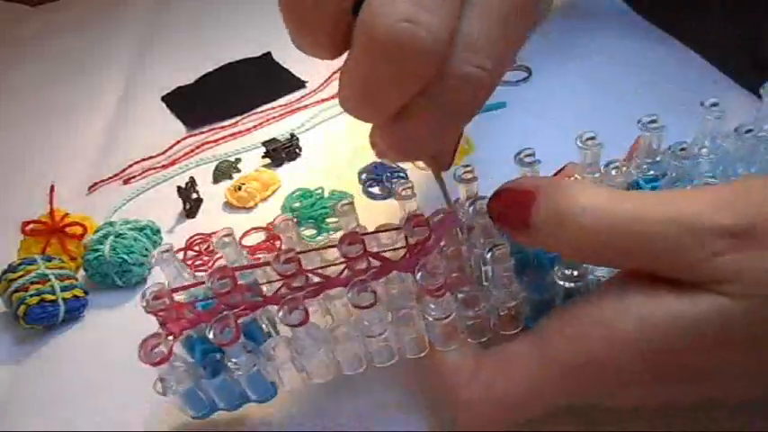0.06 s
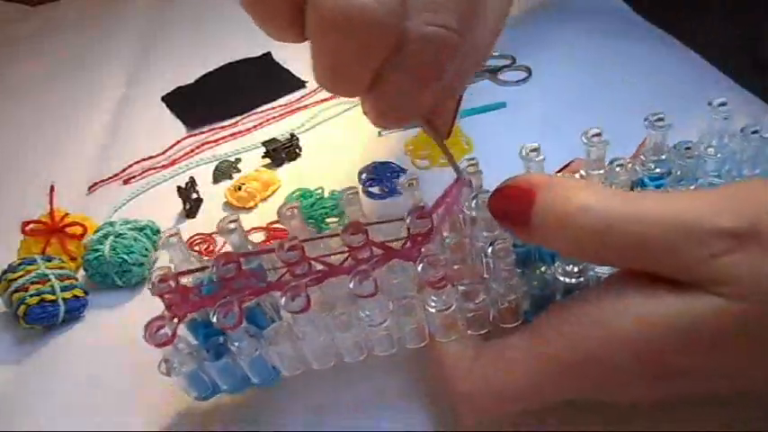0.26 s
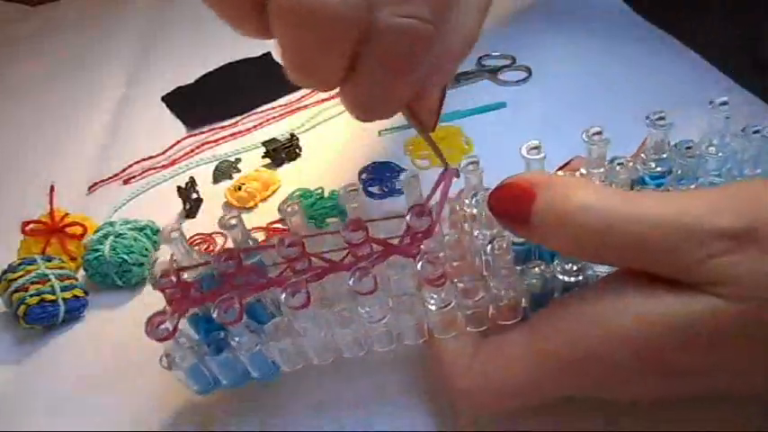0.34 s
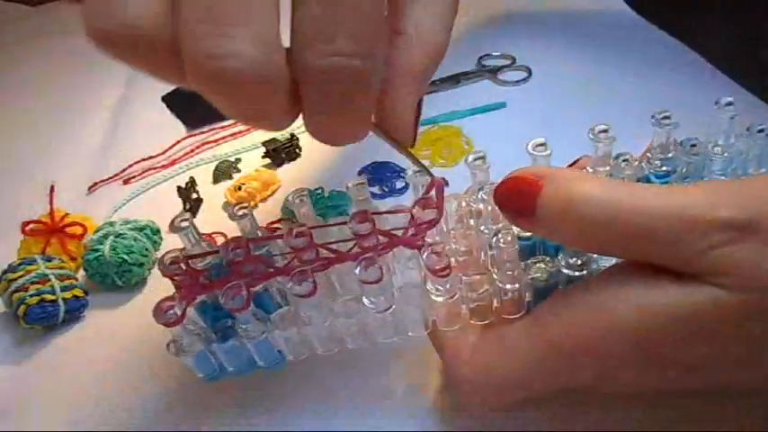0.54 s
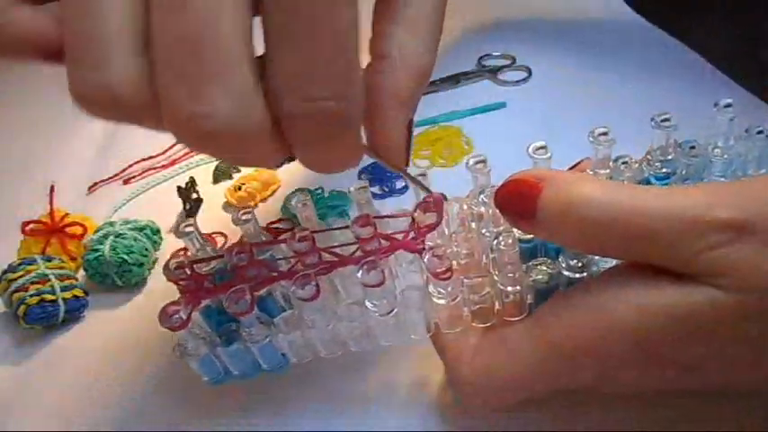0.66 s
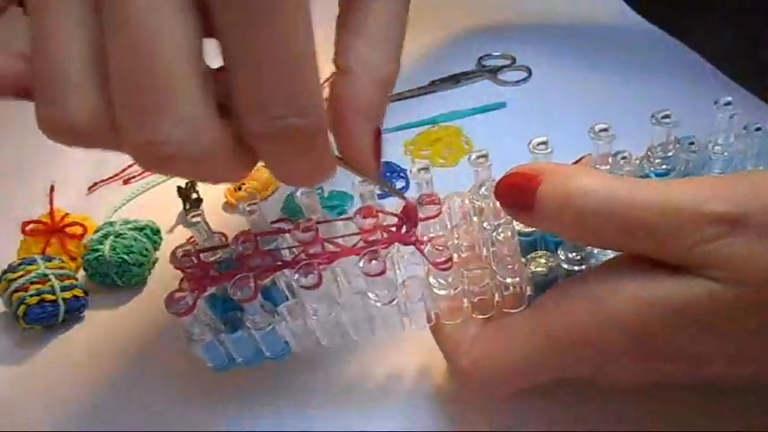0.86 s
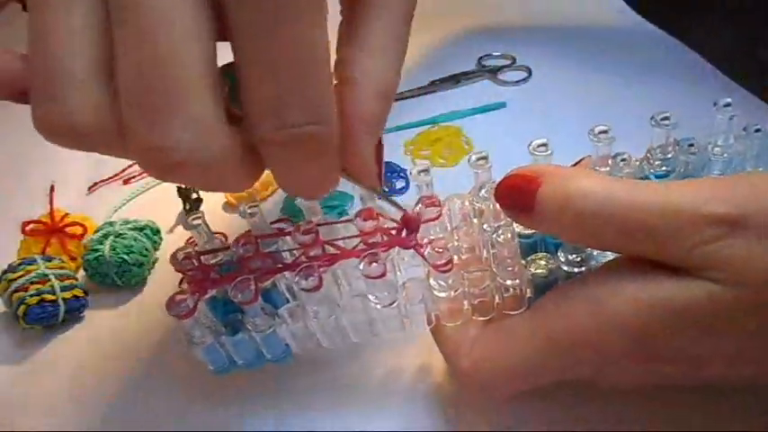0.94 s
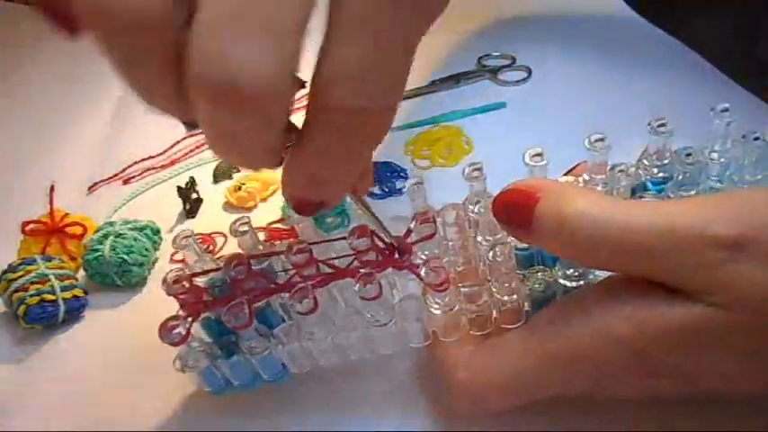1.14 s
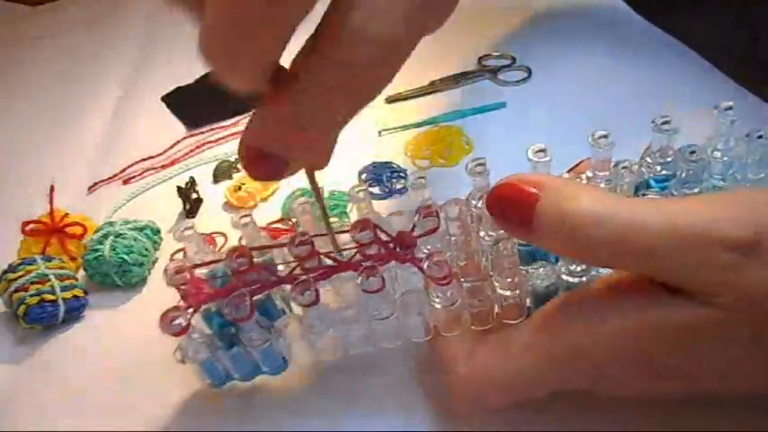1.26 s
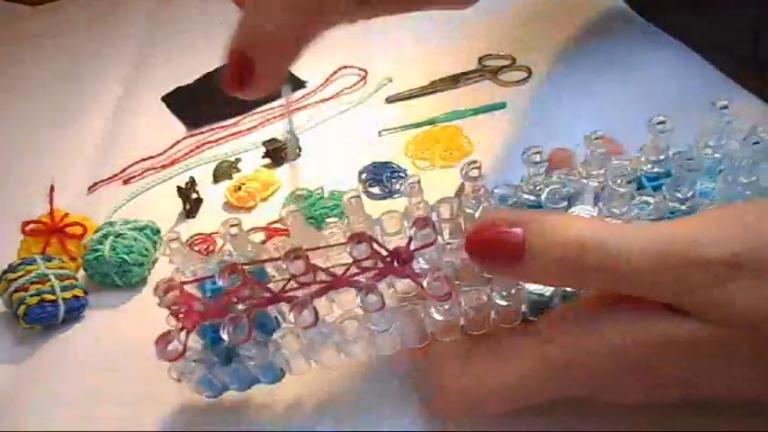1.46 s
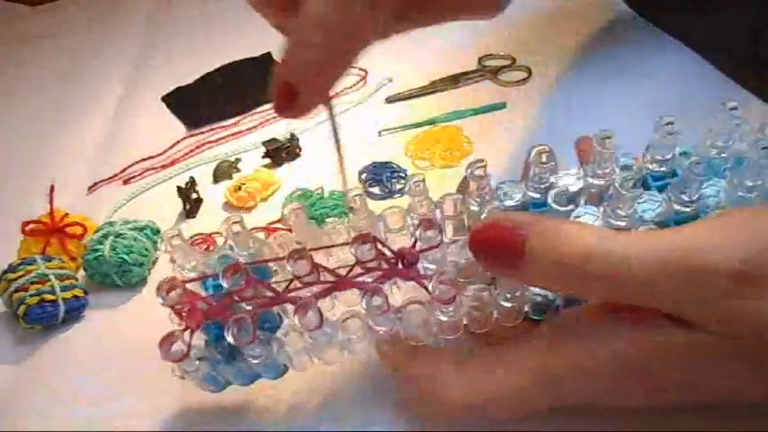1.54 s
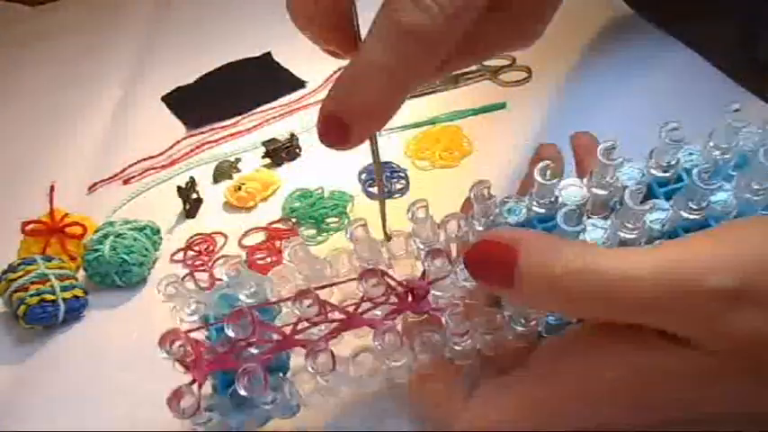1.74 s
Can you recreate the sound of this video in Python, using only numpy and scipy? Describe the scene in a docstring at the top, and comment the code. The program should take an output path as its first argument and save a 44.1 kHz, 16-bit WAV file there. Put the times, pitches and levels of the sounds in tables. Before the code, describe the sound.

Metal hook clicks sharply on hollow plastic loom pegs as rubber bands slip off, close up

```python
"""Clicks of a metal hook on the pegs of a hollow plastic loom, and of rubber bands slipping off them, close by:
brief chattering forces excite damped plastic modes, one peg's own note and a dense body noise.
Hollow knocks are decaying sines, rubbing is a train of random impulses, squeaks are narrow resonant noise.
A small room answers; shaped noise hisses steadily beneath, with a narrow fan-like band near 1 kHz.
The recorder samples at half rate and holds each sample, mirroring the treble."""
import sys
import numpy as np
from scipy import signal
from scipy.io import wavfile
from scipy.ndimage import uniform_filter1d

SR = 44100
rng = np.random.default_rng(int(sys.argv[2]) if len(sys.argv) > 2 else 0)


def waveform_to_disk(signal):
    """Save audio, clipped to [-1, 1], as 16-bit WAV at the path in sys.argv[1]."""
    frames = np.transpose(np.atleast_2d(signal))
    scaled = np.clip(frames, -1, 1) * 32767
    samples = np.round(scaled).astype(np.int16)
    wavfile.write(sys.argv[1], SR, samples)


def gain_from_db(level_db):
    """Turn a decibel level (scalar or array-like) into a linear amplitude factor."""
    decades = np.asarray(level_db, float) / 20
    return 10 ** decades


N = 77175  # length in samples
CLICK_N = 2600  # length of one click in samples


def evened(x):
    """Normalisation: scales a signal to an rms value of 1."""
    return x / np.sqrt(np.mean(x ** 2) + 1e-20)


def read(points, hz):
    """Interpolation of a table along a logarithmic frequency axis."""
    f, value = np.transpose(points)
    return np.interp(np.log(hz + 1), np.log(f + 1), value)


def add(mix, s, sound):
    """Superposition: adds a sound to the mix at time s, in place."""
    part = mix[round(s * SR):][:len(sound)]
    part += sound[:len(part)]


def coloured(x, points):
    """Minimum-phase filtering: the Hilbert transform of the log gain gives a causal phase."""
    hz = abs(np.fft.fftfreq(2048, 1 / SR))
    log_gain = np.log(gain_from_db(np.maximum(read(points, hz), -100)))
    phase = -signal.hilbert(log_gain).imag
    taps = np.fft.ifft(np.exp(log_gain + 1j * phase)).real[:1024]
    return signal.oaconvolve(x, taps)[:len(x)]


def lowpass(x, hz):
    """Band limitation by a steep linear-phase filter."""
    taps = signal.firwin(301, hz, window=("kaiser", 8), fs=SR)
    return signal.oaconvolve(x, taps[None], "same")


# Modes of the plastic loom: f/Hz, level/dB
LOOM_MODES = [(1300, -8), (1520, -9), (1930, 0), (2080, -4), (2700, 0), (3100, -2), (3420, -1), (4080, -1),
              (4550, -3), (5170, 0), (5800, -4), (6100, -6), (6640, -7), (7740, -12)]
LONGEST_T60_S, MOST_CYCLES = .023, 85  # every mode dies 60 dB within both limits
MODE_SPREAD, SPOT_DB = .01, 2  # standard deviations: relative detuning of the pegs, unevenness of the strike


def ring(draw):
    """Modal superposition: one tap at one peg answers as a sum of exponentially damped sines."""
    t = np.arange(CLICK_N) / SR
    hz, db = np.transpose(LOOM_MODES)[:, :, None]
    count = len(LOOM_MODES)
    detune, spot = draw[:count, None], draw[count:2 * count, None]
    fade_db = -60 * t / np.minimum(LONGEST_T60_S, MOST_CYCLES / hz)
    tuned_hz = hz * (1 + MODE_SPREAD * detune)
    return (gain_from_db(db + SPOT_DB * spot + fade_db) * np.sin(2 * np.pi * tuned_hz * t)).sum(0)


# Relative spectrum of the dense ringing of the plastic: f/Hz, level/dB per Hz
PLASTIC_SPECTRUM = [(290, -68), (500, -32), (775, -38.5), (1940, 2.5), (2320, 1.5), (2670, 9.5),
                    (2960, 6.5), (4780, -1), (5160, 2), (8210, -6.5), (10900, -38.5), (14200, -32),
                    (22000, -120)]
DENSE_DB, DENSE_T60_S = -3, .012  # dense ringing relative to the modes, and its decay
PEG_CYCLES = 46  # the struck peg's own note dies 60 dB in this many cycles
CHATTER_DB = 3  # unevenness of the chatter impulses
LOW_HZ, MID_HZ, BITE_HZ, HIGH_HZ = 1110, 2320, 4070, 6600  # where lows, 0 dB, bite and highs apply
BELOW_HZ, BELOW_DB = 880, -14  # clicks thin out under the lowest mode, relative to the lows


def click(row, rise_s, edge_db, crack_db, r):
    """Source-filter principle: a few milliseconds of chatter excite the modes, the peg and the dense body."""
    _, level_db, peg_hz, peg_db, low_db, bite_db, high_db, chatter_s = row
    t, edge_at = np.arange(CLICK_N) / SR, round(rise_s * SR)
    rise = np.minimum(t / rise_s, 1) ** 2
    fall = np.exp(-(np.maximum(t - rise_s, 0) / chatter_s) ** 2)
    force = rise * fall

    # sparse impulses of random sign, then one hard edge where the force has risen
    size, chance = r[40:900], r[900:1760]
    impulses = np.sign(size) * gain_from_db(CHATTER_DB * abs(size)) * (abs(chance) > 1)
    drive = impulses * force[:860]
    drive[edge_at] = -gain_from_db(edge_db)

    # the body stores the power of the force and loses it exponentially
    power = signal.lfilter([1], [1, -gain_from_db(-120 / SR / DENSE_T60_S)], force ** 2)
    dense = r[1400:] * np.sqrt(power / power.max())
    dense[edge_at] -= gain_from_db(crack_db)

    peg = gain_from_db(-60 * t * peg_hz / PEG_CYCLES) * np.sin(2 * np.pi * peg_hz * t)
    answer = evened(ring(r[:40])) + gain_from_db(peg_db) * evened(peg)
    modes = signal.fftconvolve(drive, answer)[:CLICK_N]
    body = evened(modes) + gain_from_db(DENSE_DB) * evened(coloured(dense, PLASTIC_SPECTRUM))
    tone = [(BELOW_HZ, low_db + BELOW_DB), (LOW_HZ, low_db), (MID_HZ, 0), (BITE_HZ, bite_db),
            (HIGH_HZ, high_db)]
    sound = coloured(body, tone)
    # twice the largest rms value in any 3 ms serves as the peak
    peak = 2 * np.sqrt(uniform_filter1d(sound ** 2, 130).max())
    return -gain_from_db(level_db) * sound / peak


# Hook snapping onto a peg:
# t/s, peak level/dB, peg f/Hz, peg note level/dB, lows level/dB, bite level/dB, highs level/dB, chatter t/s
HOOK_SNAPS = [(0.0644, -35, 2380, -2, 10, -3, -7, 0.0036),
              (0.0834, -29.5, 1830, -6.5, -0.5, -2.5, -5, 0.0022),
              (0.1838, -31.5, 2200, 3.5, 4.5, 4, 2, 0.01), (0.2601, -23, 4140, 11, -1, -6.5, -4.5, 0.0049),
              (0.2817, -28.5, 2040, 5, -8, 9, 8, 0.0072), (0.3058, -22.5, 2040, 10, -7, 1.5, 10.5, 0.0043),
              (0.358, -20, 2580, 32, 6, 1, 23.5, 0.0093), (0.4066, -25, 2800, -21, 4, -1.5, -3.5, 0.007),
              (0.4592, -14, 1742, 3, -1, 0.5, -1.5, 0.0056), (0.847, -23.5, 1610, 0.5, 4.5, 9, 9, 0.0052),
              (0.8941, -8.5, 1940, 10.5, -4, 4, 4.5, 0.0046),
              (1.0192, -19.5, 2870, 4, -7.5, -3, -5, 0.0028),
              (1.1425, -25, 2004, -0.5, -6.5, -5.5, -4, 0.0037),
              (1.3665, -19.5, 2300, 3, 4, 3, 0.5, 0.0061), (1.486, -27.5, 2000, -3.5, 6, 0, -1, 0.0034)]
# Band or hook slipping off a peg, with a softer start:
# t/s, peak level/dB, peg f/Hz, peg note level/dB, lows level/dB, bite level/dB, highs level/dB, chatter t/s
PEG_SLIPS = [(0.1104, -39, 2070, 0, 0.5, 0, 1, 0.0026), (0.206, -43.5, 1380, -4, -4, -14, -19, 0.0029),
             (0.2137, -38.5, 1830, 13, -1, 0, -4, 0.0051), (0.223, -37.5, 1820, 9, 6, 0, -14, 0.0063),
             (0.2412, -22.5, 1310, -4, -12, -8, -1.5, 0.002), (0.3328, -29.5, 2620, -8, 7, -5, -2, 0.0065),
             (0.3457, -28, 2130, 12, -7, 3, -2, 0.0048), (0.3616, -21, 3720, 3, 3, 0, 1, 0.0034),
             (0.4224, -39.5, 2090, 8, 3, -9, 7, 0.0068), (0.4446, -25.5, 1830, -8, 0, -4, -7, 0.0056),
             (0.5562, -16, 4730, -2, 1, 7.5, 6.5, 0.0042), (0.7005, -20, 4680, -7.5, -23, 0.5, 0.5, 0.0031),
             (0.8266, -49, 1640, -18, -5, 3, 19, 0.0021), (0.8525, -30, 1930, 6, 10, -18, -5, 0.0026),
             (0.933, -39.5, 2000, 5, 16, -6, -4, 0.012), (1.0008, -26.5, 2190, 3, -4, -3.5, 1, 0.0069),
             (1.0165, -27, 6400, -0.5, -7, -10.5, -6.5, 0.0019), (1.3442, -32.5, 1960, 8, 3, 0, -2, 0.019),
             (1.3725, -27, 2140, 1, 7, -5, 7.5, 0.006), (1.4762, -38.5, 1620, 3, 2, -4, 3.5, 0.0044),
             (1.5974, -28.5, 1870, 3, -3.5, 0.5, -1.5, 0.004)]
# rise of the force in s; edge of the drive and crack of the dense body in dB
SNAP_RISE_S, SNAP_EDGE_DB, SNAP_CRACK_DB = .0005, 16, 16
SLIP_RISE_S, SLIP_EDGE_DB, SLIP_CRACK_DB = .0023, 11, 0  # a slip lets go with a weaker edge
BASS_CUT_HZ = 700  # the small loom radiates no bass


def snaps_and_slips():
    """Impact and sudden release: a fast force with a hard edge for snaps, a slower, weaker one for slips."""
    out = np.zeros(N)
    kinds = [(HOOK_SNAPS, SNAP_RISE_S, SNAP_EDGE_DB, SNAP_CRACK_DB),
             (PEG_SLIPS, SLIP_RISE_S, SLIP_EDGE_DB, SLIP_CRACK_DB)]
    for table, rise_s, edge_db, crack_db in kinds:
        for row, r in zip(table, rng.standard_normal((len(table), 4000))):
            add(out, row[0], click(row, rise_s, edge_db, crack_db, r))
    bass_cut = signal.butter(4, BASS_CUT_HZ, "high", fs=SR, output="sos")
    return signal.sosfilt(bass_cut, out)


# Hollow knocks of the loom's base: t/s, level/dB, f/Hz, T60 t/s
BASE_KNOCKS = [(1.368, -40, 495, .04), (1.3665, -32, 1080, .03), (.4605, -29, 1120, .03),
               (.4475, -34, 1290, .03), (.4075, -38, 1290, .03), (.7025, -40, 1305, .045),
               (.5575, -39, 1140, .035), (1.369, -48, 720, .025)]


def knocks():
    """Free damped vibration: each knock is one exponentially decaying sine with a 2 ms onset."""
    out = np.zeros(N)
    t = np.arange(4000) / SR
    for s, db, hz, t60 in BASE_KNOCKS:
        envelope = gain_from_db(db - 60 * t / t60) * np.minimum(t / .002, 1)
        add(out, s, envelope * np.sin(2 * np.pi * hz * t))
    return out


# Rubbing of bands and fingers on the pegs: t/s, level/dB
RUB_LEVEL = [(0, -53.5), (.06, -53.5), (.14, -62), (.2, -79), (.32, -52), (.35, -52), (.43, -57.5),
             (.52, -60), (.8, -92), (.92, -52), (.97, -60), (1.1, -63), (1.33, -86), (1.4, -59), (1.5, -67),
             (1.588, -50.5), (1.65, -56), (1.75, -67)]
# Relative spectrum of the rubbing: f/Hz, level/dB per Hz
RUB_SPECTRUM = [(350, -22.5), (600, -12), (999, -8), (2090, 1.5), (2360, -14), (3160, 3), (3570, 0),
                (4180, -6), (10900, -33), (14200, -72), (22000, -120)]
# Brighter rustle within the rubbing: t/s, level/dB
RUSTLE_LEVEL = [(0, -54.5), (.075, -61), (.1, -72), (.3, -66), (.35, -42.5), (.42, -64), (.6, -69),
                (.89, -68), (.91, -62), (.97, -57), (1.0, -70), (1.5, -68), (1.58, -54.5), (1.64, -56.5),
                (1.75, -61)]
GRAINS_PER_S, GRAIN_DB = 5000, 2  # mean rate of the slips, mean of their exponential spread in level
RUB_MODES_DB = -10  # loom modes relative to the coloured grains
RUSTLE_LOW_HZ, RUSTLE_HIGH_HZ = 4200, 6940


def rubbing():
    """Stick-slip friction as a random impulse train: dense tiny slips partly ring the loom."""
    sign = rng.choice([-1., 1.], N)
    size = gain_from_db(GRAIN_DB * rng.exponential(1, N))
    grains = sign * size * (rng.random(N) < GRAINS_PER_S / SR)
    modes = signal.oaconvolve(grains, ring(np.zeros(40)))[:N]
    rub = evened(coloured(grains, RUB_SPECTRUM)) + gain_from_db(RUB_MODES_DB) * evened(modes)
    band = signal.butter(2, [RUSTLE_LOW_HZ, RUSTLE_HIGH_HZ], "band", fs=SR, output="sos")
    rustle = evened(signal.sosfilt(band, grains[::-1]))  # reversed, so its grains fall at other times
    t = np.arange(N) / SR
    rub_gain = gain_from_db(np.interp(t, *np.transpose(RUB_LEVEL)))
    rustle_gain = gain_from_db(np.interp(t, *np.transpose(RUSTLE_LEVEL)))
    return rub_gain * evened(rub) + rustle_gain * rustle


# Faint squeaks of stretched rubber: start t/s, length t/s, level/dB, f/Hz, bandwidth f/Hz
RUBBER_SQUEAKS = [(1.53, .09, -56, 1980, 70), (1.67, .1, -55, 4250, 90), (1.59, .07, -55, 4250, 90),
                  (1.342, .022, -46, 5150, 60), (1.347, .02, -49, 3200, 200)]


def squeaks():
    """Resonance: noise through a narrow peak filter swells and fades under a raised-cosine envelope."""
    out = np.zeros(N)
    noises = rng.standard_normal((len(RUBBER_SQUEAKS), SR // 4))
    for (s, length, db, hz, width), noise in zip(RUBBER_SQUEAKS, noises):
        n = round(length * SR)
        band = signal.lfilter(*signal.iirpeak(hz, hz / width, SR), noise)[-n:]  # the settled end
        add(out, s, gain_from_db(db) * np.hanning(n) * evened(band))
    return out


# Decay of the room: f/Hz, T60 t/s
ROOM_DECAY = [(500, 1), (2000, 0.077), (5000, 0.3), (9000, 0.24)]
# Echoes from the table and nearby things: delay t/s, level/dB
EARLY_ECHOES = [(.0031, -30), (.0068, -18.5), (.0105, -33)]
TAIL_DB, TAIL_START_S = -19.5, .006  # energy of the whole tail relative to the direct sound, and its delay


def room(x):
    """Reverberation by convolution: a few early echoes, then sparse taps dying band by band."""
    taps = np.zeros(SR // 2)
    # one tap of random sign at a random place in every 20 samples
    at = np.arange(0, SR // 2 - 20, 20) + rng.integers(0, 20, (SR // 2 - 1) // 20)
    taps[at] = rng.choice([-1., 1.], len(at))
    hz, t, z = signal.stft(taps, SR, nperseg=256)
    decay = gain_from_db(-60 * t / read(ROOM_DECAY, hz)[:, None])
    tail = signal.istft(z * decay, SR, nperseg=256)[1]
    answer = np.zeros(SR)
    add(answer, TAIL_START_S, gain_from_db(TAIL_DB) * tail / np.linalg.norm(tail))
    for k, (delay, db) in enumerate(EARLY_ECHOES):
        add(answer, delay, (-1) ** k * gain_from_db([db]))  # alternating sign
    return x + signal.fftconvolve(x, answer)[:N]


# Relative spectrum of the background hiss: f/Hz, level/dB per Hz
HISS_SPECTRUM = [(18, -68), (30, -61), (80, -17.5), (200, -21), (269, -12.5), (431, -15), (608, -9.5),
                 (705, -14.5), (948, -4), (1520, -11.5), (1850, -7.5), (2480, -9.5), (2810, -9),
                 (3020, -12), (4380, -16), (8520, -21.5), (10900, -39), (14200, -60), (22000, -120)]
HISS_DB, HISS_PATCH_DB = -55.5, 1  # rms level, and standard deviation of the drifting patches


def hiss():
    """Shaped Gaussian noise: random short-time spectra carry the colour and slight drifting patches."""
    frames, hz = N // 256 + 5, np.fft.rfftfreq(1024, 1 / SR)
    real, imag, patches = rng.standard_normal((frames, 513, 3)).T
    patches = uniform_filter1d(patches, 10, 0)  # smoothed over frequency
    patches = evened(uniform_filter1d(patches, 12, 1))  # and over time
    z = (real + 1j * imag) * gain_from_db(read(HISS_SPECTRUM, hz)[:, None] + HISS_PATCH_DB * patches)
    noise = signal.istft(z, nperseg=1024, noverlap=768)[1][:N]
    return gain_from_db(HISS_DB) * evened(noise)


# Narrow fan-like band in the background: f/Hz, bandwidth f/Hz, level/dB
FAN_BAND = (900, 31, -71)


def fan():
    """Steady resonance: noise through one narrow peak filter."""
    hz, width, db = FAN_BAND
    band = signal.lfilter(*signal.iirpeak(hz, hz / width, SR), rng.standard_normal(N))
    return gain_from_db(db) * evened(band)


def scene():
    """Superposition: the room answers the loom's sounds, and hiss and fan band are added dry."""
    loom = snaps_and_slips() + knocks() + rubbing() + squeaks()
    return (room(loom) + hiss() + fan())[None]


def top_cut(x):
    """Nothing passes above the cut-off."""
    return signal.sosfilt(signal.butter(12, 16960, fs=SR, output="sos"), x)


HALF_RATE_LIMIT_HZ = 10480  # band limit ahead of the half-rate sampling
EDGE_HZ, SHELF_DB, TOP_HZ = 15900, -26, 16930  # a weak shelf remains between edge and top


def record(dry):
    """Zero-order hold: samples at half rate, each held twice, leave mirror images of the treble."""
    sampled = lowpass(dry, HALF_RATE_LIMIT_HZ)[:, ::2]
    held = np.repeat(sampled, 2, axis=1)[:, :N]
    main = lowpass(held, EDGE_HZ)
    shelf = lowpass(held, TOP_HZ) - main
    return top_cut(main + gain_from_db(SHELF_DB) * shelf)


dry = scene()
out = record(dry)
waveform_to_disk(out)
```